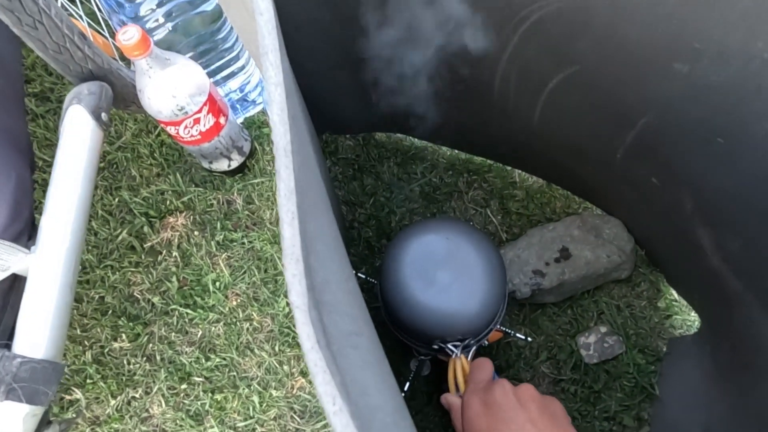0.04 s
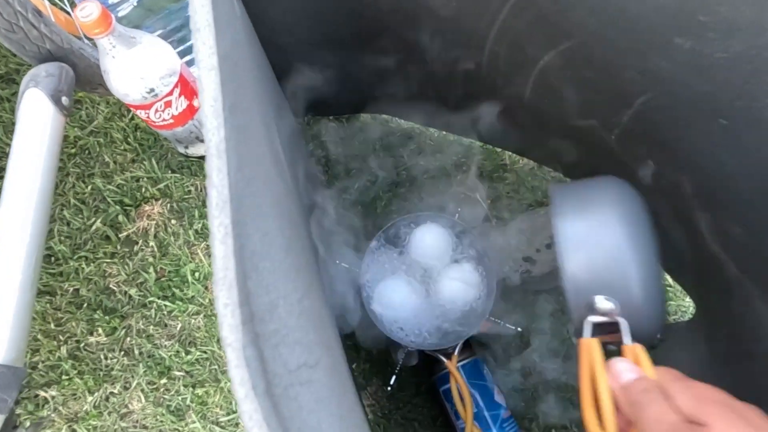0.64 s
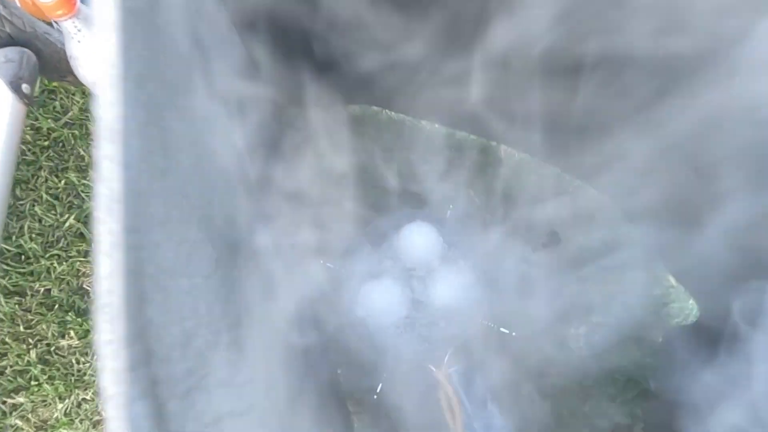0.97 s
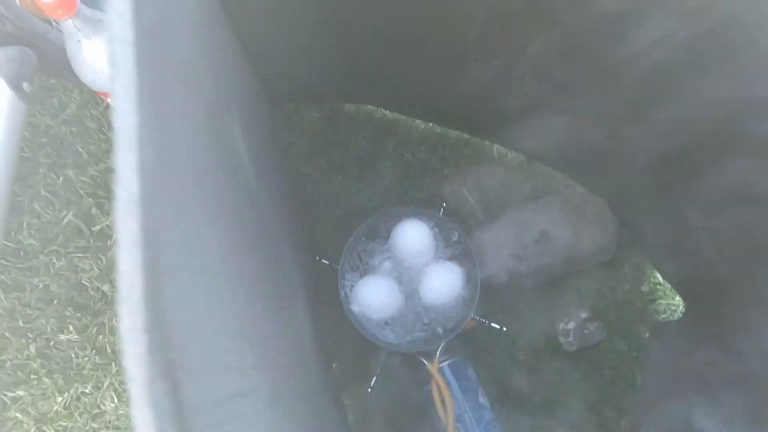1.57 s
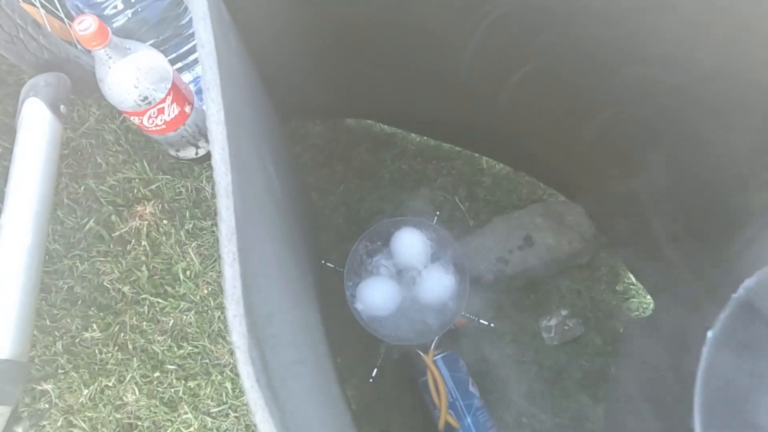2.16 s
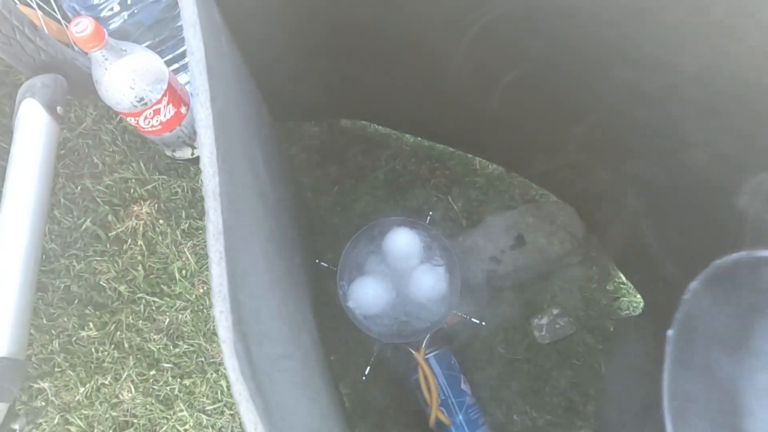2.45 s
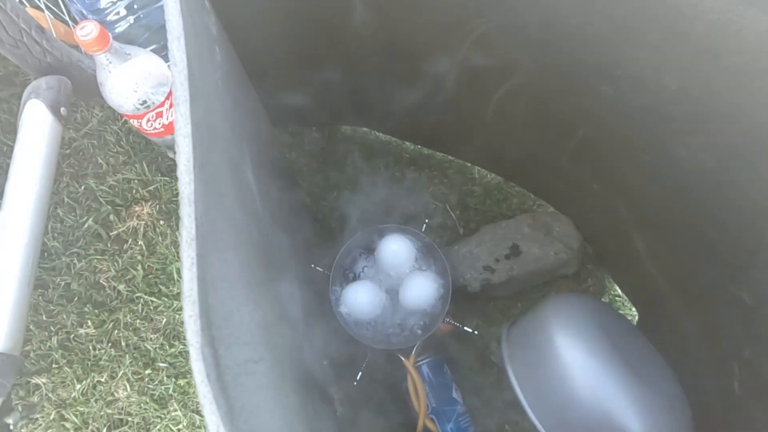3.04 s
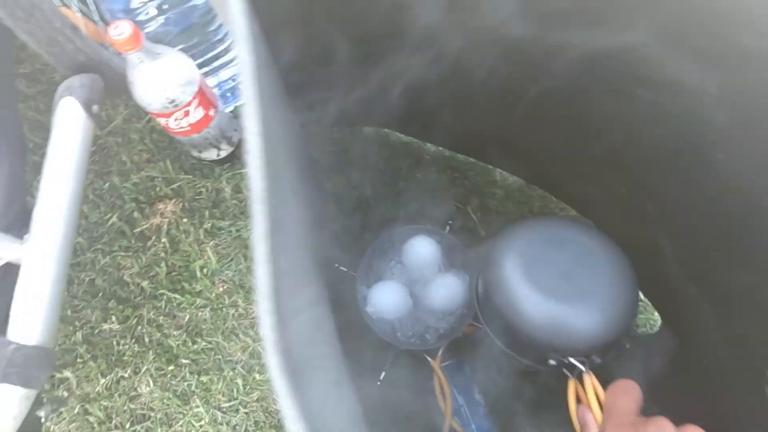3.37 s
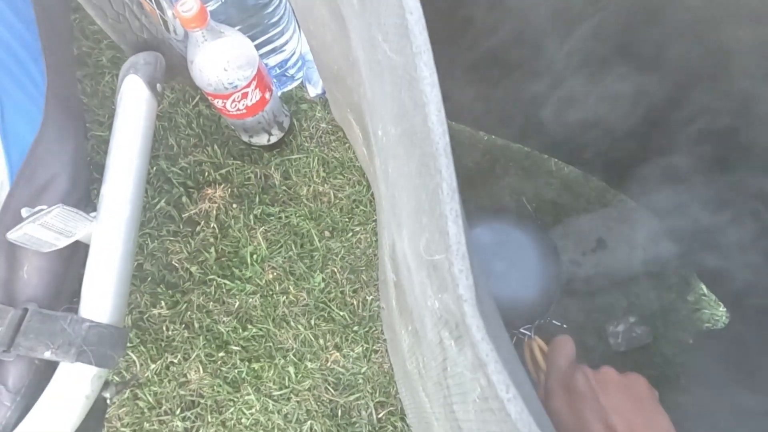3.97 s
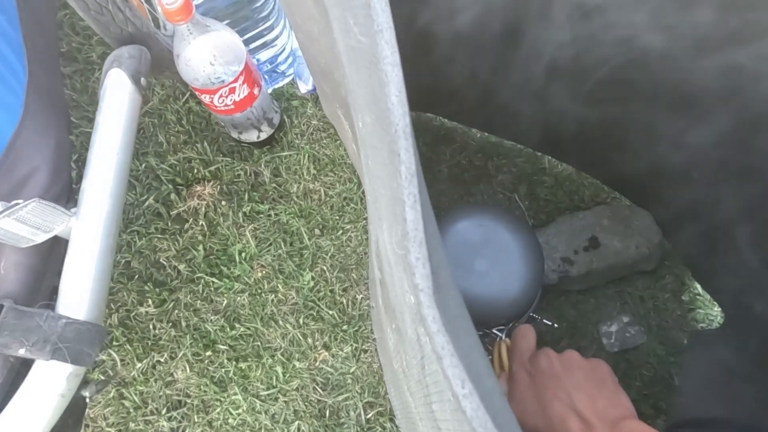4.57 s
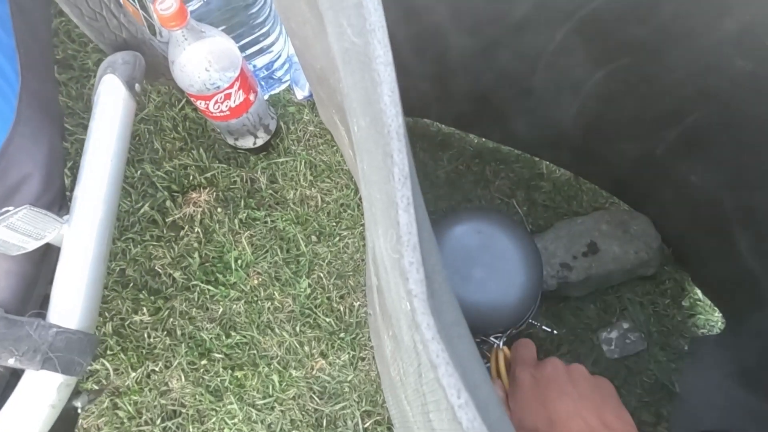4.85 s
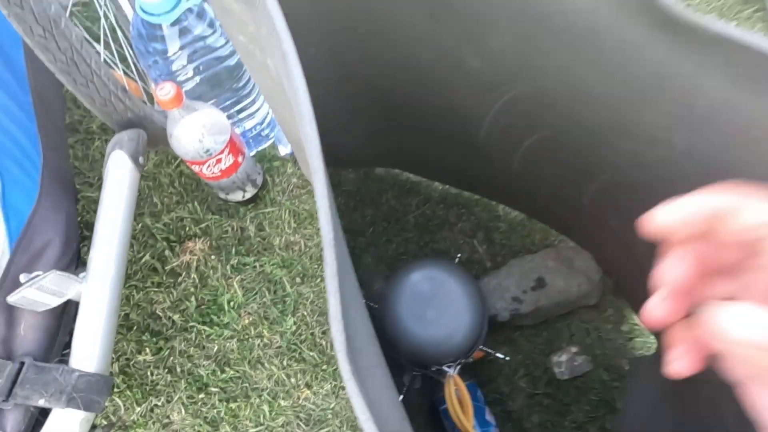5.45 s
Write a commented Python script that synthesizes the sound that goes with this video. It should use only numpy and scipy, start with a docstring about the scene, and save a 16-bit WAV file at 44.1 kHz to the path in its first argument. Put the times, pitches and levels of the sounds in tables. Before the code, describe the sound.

Close to a camping stove in the open air, a pot used as a lid clinks and comes away, letting out a brief rush of steam. Dry pops, ticks and dull knocks come from the hot pan over the burner's faint, whistling hiss. The pot clanks down again, scrapes and settles with a last clink. A light gust and soft thumps on the hand-held microphone finish it.

```python
"""On the grass, close to a small gas camping stove in a round windbreak; hand-held stereo microphone.
The burner hisses and whistles faintly throughout, with light wind on the microphone. First an upturned
metal pot is lifted off with a clink and a gush of steam. While it is held aside the hot pan spits, amid
dull handling knocks. About four seconds in, the pot is set back: it clanks, scrapes and settles.
At the end a gust passes and the hand bumps the microphone."""
import sys
import numpy as np
from scipy import signal
from scipy.fft import rfft, irfft, next_fast_len
from scipy.io import wavfile
from scipy.ndimage import map_coordinates

SR = 44100
rng = np.random.default_rng(int(sys.argv[2]) if len(sys.argv) > 2 else 0)


def to_wav(s):
    """Save 16-bit WAV."""
    ch = np.atleast_2d(s).T  # columns
    pcm = np.round(np.clip(ch, -1, 1) * 32767)  # PCM
    wavfile.write(sys.argv[1], SR, pcm.astype(np.int16))


N = 247401
TIME = np.arange(N) / SR
HIT_TIME = TIME[:SR // 2]

# wind rumble on the microphone: (frequency [Hz], level [dB])
WIND_SPECTRUM = [(12, 3), (25, 12), (45, 0), (80, -7), (130, -16), (300, -76)]
# stronger gusts: (time [s], length [s], level [dB])
GUSTS = [(.3, .16, -58), (3.3, 0.35, -52.5), (5.34, 0.31, -51)]
# the hand bumping the microphone: (time [s], level [dB])
BUMPS = [(5.492, -33.5), (5.513, -34.5), (5.59, -37)]

# the burner from the moving microphone: (time [s], flame [dB], hiss [dB])
BURNER_LEVELS = [(0, -55, -65), (.45, -62.5, -57.5), (.72, -65, -69), (.95, -67.5, -64), (2.55, -69.5, -66),
                 (2.78, -66.5, -63), (3.4, -61.5, -63.5), (4.1, -60.5, -64), (4.45, -56.5, -65),
                 (5.2, -61, -64.5), (5.61, -51, -57)]
# the flame's low flutter: (frequency [Hz], level [dB])
FLAME_SPECTRUM = [(60, -2), (110, -4.5), (180, 7.5), (260, 5), (390, -8), (560, -4.5), (680, -12.5),
                  (850, -17), (1300, -4), (3000, -42.5)]
# the hiss of gas: (frequency [Hz], level [dB])
HISS_SPECTRUM = [(500, -23.5), (900, -16), (1300, -10.5), (1650, -2), (1950, -2), (2400, 0), (3000, -5.5),
                 (3400, -6.5), (4200, -10), (5000, -16.5), (7000, -18), (14000, -38)]
# the jet's treble: (frequency [Hz], level [dB])
JET_SPECTRUM = [(1500, -14), (3500, -6.5), (5000, -2), (6500, -4), (7600, 0.5), (8700, -4.5), (9400, -6.5),
                (10200, -10.5), (11200, -17.5), (13500, -25), (15500, -52)]
# its rise and fall: (time [s], level [dB])
JET_LEVEL = [(0, -96), (.65, -69), (.95, -85), (2.65, -78), (3.22, -63.5), (3.62, -66.5), (3.95, -73.5),
             (4.5, -68.5), (5.2, -74.5), (5.61, -70)]
# the jet's breathy whistle: (frequency [Hz], width [Hz], in low register [dB], in high register [dB])
WHISTLE_PARTIALS = [(2831, 170, -63.5, -77), (5730, 240, -79.5, -67.5), (8730, 380, -95, -78)]
# its weight shifts between the first partial and the upper ones: (time [s], register [0 low, 1 high])
WHISTLE_REGISTER = [(0, 0.3), (.7, 0.65), (1.1, 0), (1.7, 0.22), (2.3, 0.77), (3.5, 0.44), (5.15, 0.94),
                    (5.61, 1)]

# the rush of steam: (frequency [Hz], level [dB])
STEAM_SPECTRUM = [(300, -5), (800, -4), (1400, -4), (2300, 0.5), (3500, 1.5), (4600, -6), (6000, -5),
                  (7200, -7.5), (8400, -28), (10200, -18.5), (13000, -26), (15500, -37)]
# steam gushes as the pot tips and as it comes away: (time [s], length [s], level [dB])
GUSHES = [(.26, .27, -52), (.555, 0.13, -50)]
# sputtering in the pan: (frequency [Hz], level [dB])
SPUTTER_SPECTRUM = [(150, 7.5), (300, 2), (420, -15), (650, 7.5), (900, -5), (1400, 2.5), (2200, -3),
                    (3000, -4.5), (4500, -16.5), (9000, -27), (14000, -41)]
# sharp spits in the pan: (time [s], level [dB], pitch [Hz])
SPITS = [(1.037, -46, 2030), (1.2939, -29.5, 2300), (1.322, -39.5, 1900), (1.689, -50, 1900),
         (2.131, -46.5, 1480), (2.178, -48, 1950), (2.401, -52, 1410), (2.712, -60, 1900),
         (2.97, -54, 1300), (3.253, -43.5, 1330)]
# fine ticks of hot metal: (time [s], level [dB])
TICKS = [(1.779, -62), (1.92, -63), (2.15, -66), (2.256, -60.5), (2.436, -57), (2.85, -58), (3.547, -55),
         (4.006, -48.5), (4.455, -58)]
# the colour of a tick: (frequency [Hz], level [dB])
TICK_SPECTRUM = [(3000, -20), (5500, -3), (8000, 0), (10000, -9), (15000, -34)]

# dull knocks of handling: (time [s], level [dB], pitch [Hz], crack [dB])
KNOCKS = [(0.021, -43, 283, -43.5), (0.374, -40, 644, -65), (0.384, -36, 760, -66), (.399, -33.5, 870, -56),
          (0.6, -47.5, 596, -76), (1.503, -51.5, 566, -64), (1.654, -43, 510, -55),
          (1.818, -49.5, 580, -67), (1.878, -52, 636, -68), (2.266, -47, 567, -80), (2.662, -49, 750, -57),
          (3.192, -32, 765, -49), (3.352, -45.5, 640, -66), (3.455, -39.5, 570, -55),
          (3.515, -46, 260, -67), (3.736, -37, 770, -63), (3.7938, -32.5, 860, -49.5),
          (3.961, -50, 650, -56), (3.978, -44.5, 770, -65), (4.2445, -26, 587, -66),
          (4.362, -37.5, 543, -61), (4.389, -36, 525, -56), (4.58, -44, 557, -71), (4.647, -41.5, 450, -69),
          (4.668, -40, 467, -71), (5.11, -45, 505, -70), (5.155, -45, 500, -70)]
# the rub around a knock: (frequency [Hz], level [dB])
SCUFF_SPECTRUM = [(130, -12), (300, 9.5), (420, -2.5), (650, 3), (1200, 2), (2500, -4), (6000, -58)]
# the crunch of a contact: (frequency [Hz], level [dB])
CRACK_SPECTRUM = [(200, 8), (700, 3.5), (1500, 6.5), (2600, 5.5), (3800, -4), (7500, -9.5), (10000, -29),
                  (12500, -13), (15500, -51)]
# dry clicks of the wire handle: (time [s], level [dB])
HANDLE_CLICKS = [(3.186, -40.5), (3.908, -45), (3.988, -43), (4.004, -46)]
# the stove's supports shudder as the pot is moved: (time [s], length [s], level [dB])
SHUDDERS = [(.355, 0.086, -58), (3.72, .08, -59), (3.955, 0.034, -50.5), (4.22, 0.14, -57),
            (4.352, 0.088, -50), (4.57, .13, -57.5)]
# rim and wire handle sliding: (time [s], length [s], level [dB])
SCRAPES = [(.066, 0.035, -54), (.146, 0.022, -59), (.25, 0.05, -55), (4.185, 0.16, -53.5),
           (4.366, 0.085, -50), (4.54, 0.082, -50.5), (4.62, .08, -66), (4.79, 0.016, -70),
           (4.878, 0.14, -60)]
# their rasp: (frequency [Hz], level [dB])
SCRAPE_SPECTRUM = [(150, -2), (300, 10.5), (900, -4.5), (1250, 5), (1600, 7.5), (2500, 0.5), (3800, -7.5),
                   (6800, -8), (8200, -8), (11000, -13), (12300, -10.5), (15500, -38)]
# the pot's modes, before each touch scales them: (frequency [Hz], level [dB], t60 [s])
POT_MODES = [(738, -11, .09), (808, -22, .08), (1019, -10, .05), (1265, 1, .13), (1271, -15, .3),
             (1419, -29, .06), (1820, -27, .05), (2260, -32, .05), (2485, -25, .13), (3144, -30, .04),
             (4630, -34, .04), (4958, -29, .12), (6718, -38, .05), (7630, -23, .032), (7900, -28, .025),
             (8296, -29, .028), (9280, -23, .04), (10020, -32, .03)]
# the pot rings lower while it is hot: (time [s], pitch [ratio])
POT_PITCH = [(.3, .97), (4, 1)]
# pot meets stove: (time [s], ring [dB], low modes' ring length [ratio], overtone boost [dB],
# clank [dB], clank pitch [Hz], crack [dB])
CLINKS = [(.247, -43.5, 3.44, 5, -41, 1650, -31), (4.116, -22, 1.95, 4, -21, 890, -31.5),
          (4.1557, -34.5, 1.5, 5, -31.5, 760, -40.5), (4.173, -35, 2, 2, -35, 850, -48),
          (4.229, -53, 1.9, 23, -31, 610, -48), (4.5577, -39, 1.2, 6.5, -43, 640, -55),
          (4.9458, -28, 0.7, 9, -29.5, 613, -32.5)]

# sound at the microphone's two ports: (frequency [Hz], left minus right [dB], left lead [rad])
MIC_PORTS = [(100, -1, 0), (400, -1.5, 0), (750, -5, 0), (1300, -2, -.05), (2000, -2.5, -.4),
             (3300, -2.8, -.8), (5700, -3.5, -.35), (7800, .5, -.1), (9000, 0, .1), (11000, 1, .6),
             (15000, -3, 0)]
# the image starts almost mono and opens: (time [s], width [0-1])
STEREO_WIDTH = [(0, .02), (.7, .02), (1.3, .4), (2.5, .85), (3.4, 1), (5.61, 1)]

BREEZE_DB, BREEZE_SWING_DB = -68.5, 4.5
LEAK_DB, LEAK_END_S, LEAK_FALL_DB_PER_S = -63.5, 0.79, 147  # steam dies away once the pot is clear
OPEN_FROM_S, OPEN_UNTIL_S = .7, 4.1  # the pan is uncovered
SPUTTER_DB, FLURRY_DB, FLURRY_S = -71, -61, 0.063
POP_DB, POP_RANGE_DB, POP_LOW_HZ, POP_HIGH_HZ = -49.5, 7.5, 564, 2000
SPIT_CYCLES, SPIT_THUMP_DB, SPIT_CRACK_DB = 13.5, -19, -26  # ring length; levels relative to the spit
KNOCK_CYCLES = 8.8  # ring length
KNOCK_THUMP_DB, THUMP_FOLLOWS = -23.5, 0.63  # thump under a 0 dB knock; its change per dB of knock
CAVITY_HZ, CAVITY_T60_S = 214.4, 0.03  # the hollow inside the windbreak
SQUEAK_AT_S, SQUEAK_S, SQUEAK_HZ, SQUEAK_DB = .096, .03, 2450, -52
OVERTONES_ABOVE_HZ = 1500
CHOKE_S = 0.0041  # each new touch stops the ring of the one before
SECOND_CONTACT_S = .0016  # the rim crunches down just after the first touch
CUTOFF_HZ = 15750


def from_db(db):
    """Decibels to gain."""
    return 10 ** (np.asarray(db) / 20)


def rms_one(x):
    """Scale to unit rms."""
    return x / np.sqrt(np.mean(x ** 2) + 1e-20)


def in_time(rows):
    """The columns of a curve table at every sample."""
    s, *columns = np.transpose(rows)
    return [np.interp(TIME, s, column) for column in columns]


def add(out, s, sound):
    """Mix a sound in from time s on."""
    at = max(round(s * SR), 0)
    out[at:at + len(sound)] += sound[:N - at]


def swells(rows):
    """A rounded rise and fall for each row of (time [s], length [s], level [dB])."""
    level = np.zeros(N)
    for s, length, db in rows:
        add(level, s, from_db(db) * np.sqrt(np.hanning(int(length * SR))))
    return level


def colour(x, spectrum):
    """Give a noise a smooth spectrum, rolled off below its first point; rms 1."""
    size = next_fast_len(N)
    hz, db = np.transpose(spectrum)
    log_hz = np.log(np.fft.rfftfreq(size, 1 / SR) + 1)
    skirt = np.minimum(np.exp(log_hz) / hz[0], 1) ** 2
    gain = skirt * from_db(np.interp(log_hz, np.log(hz), db))
    return rms_one(irfft(rfft(x, size) * gain, size)[..., :N])


def drift(per_s):
    """A random wander with per_s changes a second; rms 1."""
    knots = rng.standard_normal(N // 20)
    return rms_one(map_coordinates(knots, [TIME * per_s + 10], order=1))


def wavering(x, depth, per_s):
    """Let the pitch of a stereo sound wander a little."""
    position = np.cumsum(1 + depth * drift(per_s))
    return np.array([map_coordinates(channel, [position], mode="mirror") for channel in x])


def stereo_noise(side_db):
    """White noise whose side signal lies at side_db relative to its mid."""
    mid, side = rng.standard_normal((2, N))
    return mid + from_db(side_db) * side * np.array([[1], [-1]])


def resonate(x, hz, width_hz):
    """A resonance applied twice, for steep skirts; rms 1."""
    r = np.exp(-np.pi * width_hz / SR)
    section = [1 - r, 0, r - 1, 1, -2 * r * np.cos(2 * np.pi * hz / SR), r * r]
    return rms_one(signal.sosfilt([section, section], x + 1e-18))


def grains(per_s, spread_db):
    """Random tiny clicks of uneven size."""
    sizes = from_db(spread_db * np.minimum(rng.exponential(1, N), 4))
    return sizes * rng.choice([-1, 1], N) * (rng.random(N) < per_s / SR)


def decay(t60):
    """An envelope falling by 60 dB in t60 seconds."""
    return np.exp(-np.log(1000) * HIT_TIME / t60)


def thud(hz, t60):
    """A soft blow swells for a moment, then dies away; envelope height 1."""
    age = HIT_TIME * 10 / t60
    return age * np.exp(1 - np.minimum(age, 100)) * np.sin(2 * np.pi * hz * HIT_TIME)


def cracks(rows, t60):
    """The brief broadband crunch of each contact, from rows of (time [s], level [dB])."""
    level = np.zeros(N)
    for s, db in rows:
        add(level, s, from_db(db) * decay(t60) * (1 - decay(t60 / 10)))
    return level * colour(rng.standard_normal(N), CRACK_SPECTRUM)


def blows(rows):
    """Each blow has a short hollow note, a thump from the windbreak's cavity, a scuff and a crack."""
    notes, scuff_level = np.zeros((2, N))
    for s, db, hz, t60, thump_db, crack_db in rows:
        thump = from_db(thump_db) * thud(CAVITY_HZ, CAVITY_T60_S)
        add(notes, s, from_db(db) * thud(hz, t60) + thump)
        add(scuff_level, s - 0.75 * t60, from_db(db - 19.5) * np.hanning(int(1.8 * t60 * SR)))
    scuffs = scuff_level * colour(rng.standard_normal(N), SCUFF_SPECTRUM)
    return notes + scuffs + cracks([(s, crack_db) for s, *_, crack_db in rows], t60=0.06)


def windbreak(x, t60, wet_db, side_db):
    """The close wall round the stove scatters each sound into a very short tail."""
    tail = stereo_noise(side_db)[:, :len(HIT_TIME)] * decay(t60) * (HIT_TIME > .002)
    tail = tail / np.sqrt(np.sum(tail ** 2) / 2)
    return x + from_db(wet_db) * signal.fftconvolve(x[None], tail, axes=1)[:, :N]


def wind():
    """A light, uneven breeze buffets the microphone, with a few stronger gusts."""
    breeze = from_db(BREEZE_DB + BREEZE_SWING_DB * drift(per_s=6))
    return (breeze + swells(GUSTS)) * colour(stereo_noise(side_db=-16), WIND_SPECTRUM)


def mic_bumps():
    """Soft low thuds of the hand, right on the microphone."""
    out = np.zeros(N)
    for s, db in BUMPS:
        add(out, s, from_db(db) * thud(hz=106, t60=0.018))
    return out


def burner(flame_side_db=-13, hiss_side_db=-6.5):
    """The flame flutters low down; the gas hisses and whistles in the jet, its lowest note unsteady."""
    flame_db, hiss_db = in_time(BURNER_LEVELS)
    jet_db, = in_time(JET_LEVEL)
    register, = in_time(WHISTLE_REGISTER)
    flame = from_db(flame_db + 2 * drift(30)) * colour(stereo_noise(flame_side_db), FLAME_SPECTRUM)
    hiss = from_db(hiss_db + 1.44 * drift(24.92)) * colour(stereo_noise(hiss_side_db), HISS_SPECTRUM)
    jet = from_db(jet_db + .5 * drift(32)) * colour(stereo_noise(hiss_side_db), JET_SPECTRUM)
    partials = []
    for hz, width_hz, low_db, high_db in WHISTLE_PARTIALS:
        level = from_db(low_db + register * (high_db - low_db) + 1.7 * drift(12))
        partials.append(level * resonate(stereo_noise(flame_side_db), hz, width_hz))
    low, middle, high = partials
    return flame + hiss + jet + wavering(low, depth=.014, per_s=5) + middle + high


def steam():
    """Vapour trapped under the pot leaks and gushes out round the rim."""
    leak = from_db(LEAK_DB - LEAK_FALL_DB_PER_S * np.maximum(TIME - LEAK_END_S, 0))
    flow = np.hypot(leak, swells(GUSHES))
    return flow * from_db(1.53 * drift(57.8)) * colour(rng.standard_normal(N), STEAM_SPECTRUM)


def pops(count):
    """Faint random pops in the open pan, as rows of (time [s], level [dB], pitch [Hz])."""
    return [(OPEN_FROM_S + when * (OPEN_UNTIL_S - OPEN_FROM_S),
             POP_DB - POP_RANGE_DB * weak,
             POP_LOW_HZ * (POP_HIGH_HZ / POP_LOW_HZ) ** high)
            for when, weak, high in rng.random((count, 3))]


def hot_pan():
    """The uncovered pan sputters drily and pops; each sharp spit sits in a short flurry."""
    uncovered = (TIME > OPEN_FROM_S) & (TIME < OPEN_UNTIL_S)
    flurries = swells([(s - FLURRY_S / 2, FLURRY_S, FLURRY_DB) for s, db, hz in SPITS])
    sputter = colour(grains(per_s=300, spread_db=2.4), SPUTTER_SPECTRUM)
    sputter_level = flurries + uncovered * from_db(SPUTTER_DB + 3.3 * drift(19))
    spits = blows([(s, db, hz, SPIT_CYCLES / hz, db + SPIT_THUMP_DB, db + SPIT_CRACK_DB)
                   for s, db, hz in [*SPITS, *pops(count=32)]])
    return sputter_level * sputter + spits


def metal_ticks():
    """The hot metal gives a fine, bright tick now and then."""
    level = np.zeros(N)
    for s, db in TICKS:
        add(level, s, from_db(db) * decay(t60=0.027))
    return level * colour(rng.standard_normal(N), TICK_SPECTRUM)


def knocks():
    """Dull handling knocks, the lower ones ringing longer, and the dry clicks of the wire handle."""
    dull = blows([(s, db, hz, KNOCK_CYCLES / hz, KNOCK_THUMP_DB + THUMP_FOLLOWS * db, crack_db)
                  for s, db, hz, crack_db in KNOCKS])
    return dull + cracks(HANDLE_CLICKS, t60=0.042)


def shudders():
    """Runs of tiny dull knocks in the stove's supports."""
    return swells(SHUDDERS) * resonate(grains(per_s=270, spread_db=3.0), hz=500, width_hz=470)


def pot_ring(pitch_ratio, length_ratio, overtones_db):
    """The pot's modes answer one touch; the hand's grip sets how long the low ones last."""
    out = 0
    for hz, db, t60 in POT_MODES:
        if hz > OVERTONES_ABOVE_HZ:
            envelope = from_db(overtones_db + rng.normal(0, 1)) * decay(t60)
        else:
            envelope = decay(t60 * length_ratio)
        out = out + from_db(db) * envelope * np.sin(2 * np.pi * hz * pitch_ratio * HIT_TIME)
    return out


def scrapes():
    """Dense little slips of metal on metal rasp and keep the pot ringing; the handle squeaks once."""
    catching = from_db(2.2 * drift(110))  # the rim sticks and lets go
    slips = swells(SCRAPES) * catching * colour(grains(per_s=1500, spread_db=3.0), SCRAPE_SPECTRUM)
    body = pot_ring(pitch_ratio=1, length_ratio=1, overtones_db=11)
    ringing = from_db(-11.5) * signal.fftconvolve(slips, body / np.linalg.norm(body))[:N]
    squeak_level = swells([(SQUEAK_AT_S, SQUEAK_S, SQUEAK_DB)])
    squeak = squeak_level * resonate(rng.standard_normal(N), SQUEAK_HZ, width_hz=140)
    return slips + ringing + squeak


def clinks():
    """The pot rings at its modes until its next touch, while the stove under it clanks."""
    out = np.zeros(N)
    next_touches = [s for s, *_ in CLINKS[1:]] + [TIME[-1]]
    for touch, next_s in zip(CLINKS, next_touches):
        s, ring_db, length_ratio, overtones_db, clank_db, clank_hz, _ = touch
        pitch_ratio = np.interp(s, *np.transpose(POT_PITCH))
        choke = np.clip(1 - (s + HIT_TIME - next_s) / CHOKE_S, 0, 1)
        add(out, s, from_db(ring_db) * choke * pot_ring(pitch_ratio, length_ratio, overtones_db))
        clank = thud(clank_hz, t60=0.015) + from_db(-17.5) * thud(hz=315, t60=0.057)
        add(out, s, from_db(clank_db) * clank)
    return out + cracks([(s + SECOND_CONTACT_S, crack_db) for s, *_, crack_db in CLINKS], t60=0.045)


def microphone(x):
    """Each frequency reaches the two ports with its own level and phase; width scales the difference."""
    size = next_fast_len(N)
    hz, balance_db, lead_rad = np.transpose(MIC_PORTS)
    bins_hz = np.fft.rfftfreq(size, 1 / SR)
    split = np.array([[.5], [-.5]])  # half to each port, in opposite directions
    gain = from_db(split * np.interp(bins_hz, hz, balance_db))
    phase = np.exp(1j * split * np.interp(bins_hz, hz, lead_rad))
    stereo = irfft(rfft(x, size) * gain * phase, size)[:, :N]
    width, = in_time(STEREO_WIDTH)
    mid = stereo.mean(axis=0)
    return mid + width * (stereo - mid)


def scene():
    """Stove and pot stand close by, a little to the right; wind and bumps are at the microphone."""
    pot_and_pan = clinks() + scrapes() + shudders() + knocks() + hot_pan() + metal_ticks()
    enclosed = windbreak(pot_and_pan, t60=.09, wet_db=-15, side_db=-4)
    return microphone(enclosed + burner() + steam() + wind() + mic_bumps())


def record(dry):
    """A steep low-pass takes off the very top."""
    return signal.sosfilt(signal.ellip(12, .1, 80, CUTOFF_HZ, fs=SR, output="sos"), dry)


dry = scene()
out = record(dry)
to_wav(out)
```